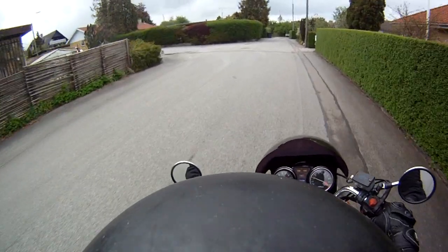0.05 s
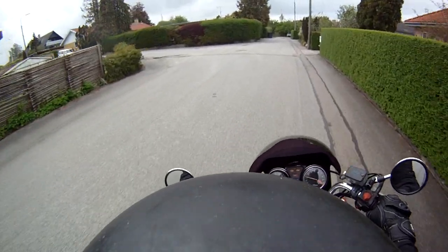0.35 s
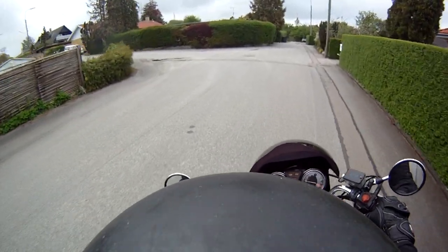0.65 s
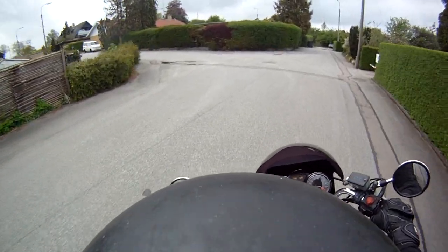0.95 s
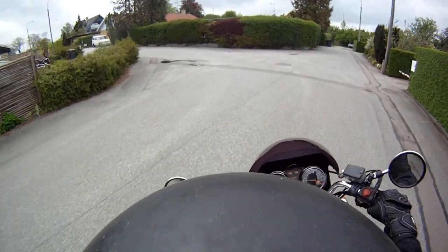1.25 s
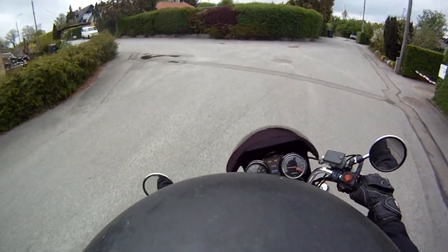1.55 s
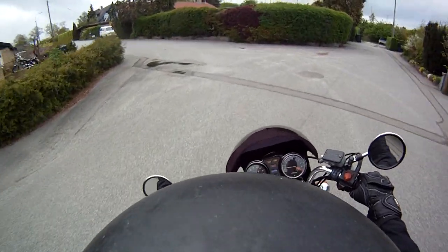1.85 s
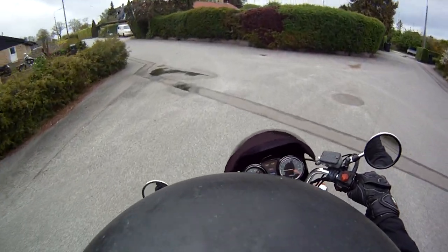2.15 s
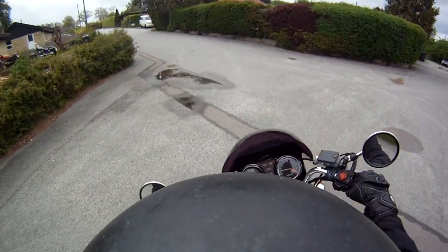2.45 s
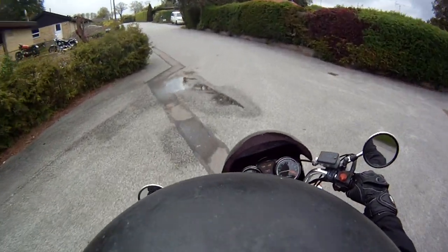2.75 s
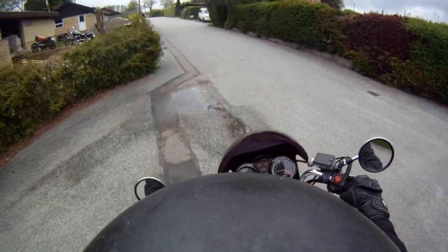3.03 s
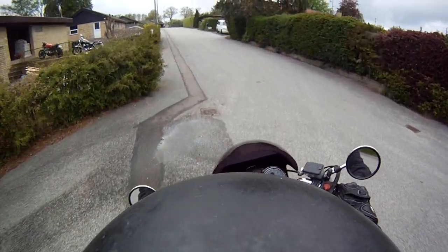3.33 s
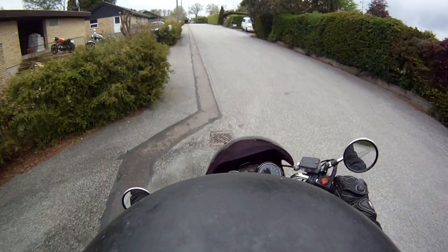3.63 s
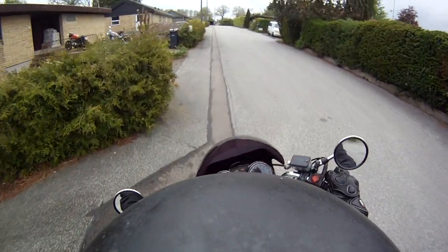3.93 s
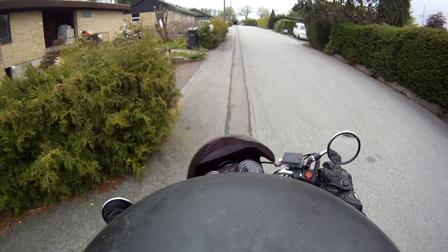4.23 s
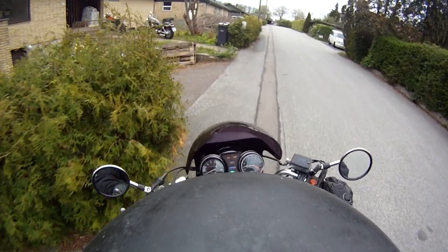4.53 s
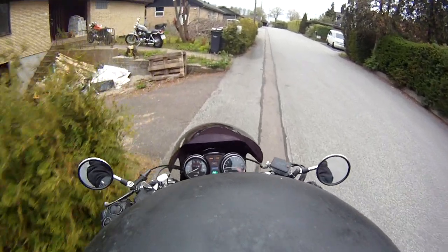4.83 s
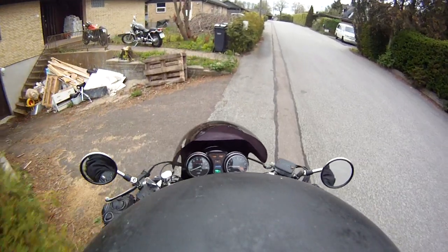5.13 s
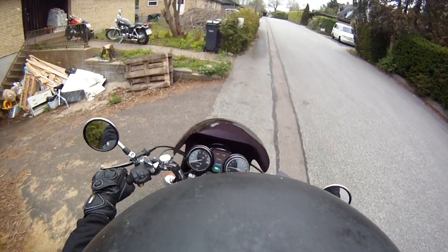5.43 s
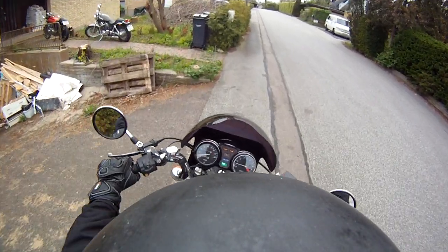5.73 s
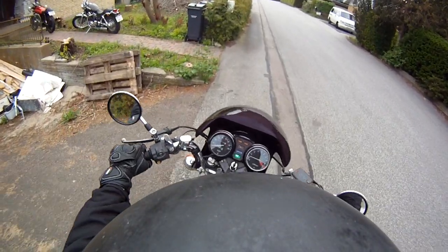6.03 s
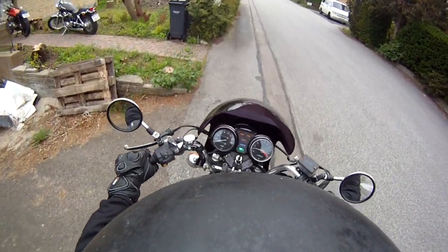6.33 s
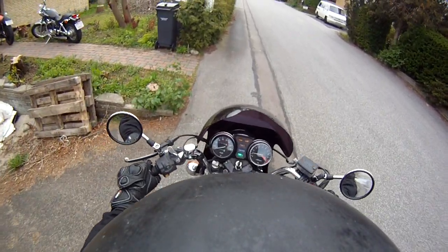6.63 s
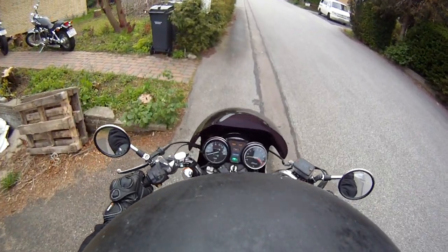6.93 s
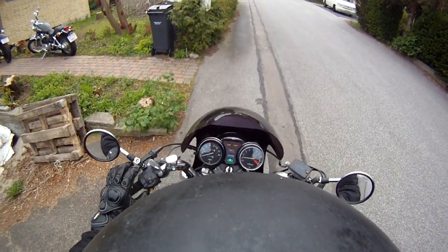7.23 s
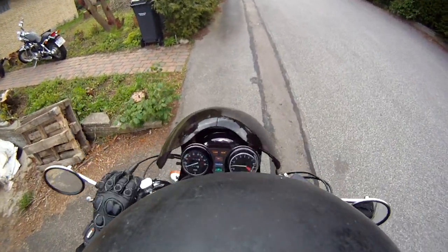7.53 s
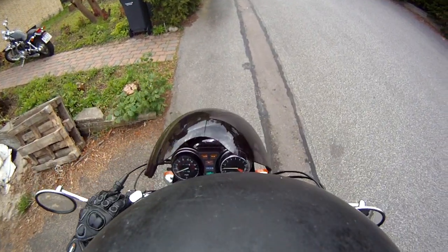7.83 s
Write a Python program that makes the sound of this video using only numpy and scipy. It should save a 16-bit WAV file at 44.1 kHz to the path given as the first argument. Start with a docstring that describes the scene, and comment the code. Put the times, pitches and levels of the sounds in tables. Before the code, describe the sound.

A four-cylinder motorcycle slows along a residential street, heard close up from the rider's helmet. In the first second the revs fall, stumbling once, and settle into a low, lumpy idle that lasts throughout, with a booming exhaust and lightly rattling gears. Tyre noise and low gusts of wind run underneath. At about 1.3 seconds a gear engages with a metallic clunk, and a faint thin hiss dies away. From 1.5 to 3 seconds road bumps make a string of dull thuds, the strongest near 2.8 seconds. Around 4.8 seconds the brake gives two faint, brief, high squeaks. The tyres then grow quieter and the wind eases as the bike slows to a crawl. Between 7.3 and 7.7 seconds the gear lever clicks softly three times over the idling engine. A slight treble fizz lies over the whole sound.

```python
"""A four-cylinder motorcycle slows down, heard from the rider's helmet. First the revs fall to a lumpy
idle: uneven firings boom in the exhaust and loose gears rattle, over tyre noise and wind. At 1.3 s a
gear clunks in, a thin hiss dies away, and bumps thud until 3 s. Near 4.8 s the brake squeaks twice.
The tyres grow quieter as the bike slows to a crawl, and after 7 s the gear lever clicks.
Throughout, each sample is held at a low rate, which mirrors the sound into a thin treble fizz."""
import sys
import numpy as np
from scipy import signal
from scipy.fft import rfft, irfft, next_fast_len
from scipy.io import wavfile
from scipy.ndimage import uniform_filter1d, map_coordinates

SR = 44100
rng = np.random.default_rng(int(sys.argv[2]) if len(sys.argv) > 2 else 0)


def unload_wav(signal):
    """Save mono or channel-first audio to the path in sys.argv[1] as 16-bit WAV at rate SR, clipped to [-1, 1]."""
    wavfile.write(
        sys.argv[1],
        SR,
        np.round(np.clip(np.atleast_2d(signal).T, -1, 1) * 32767).astype(np.int16),
    )


N = 351477
TIME = np.arange(N) / SR
IDLE_RPM = 1150
# how fast the engine turns (time [s], speed [rpm])
ENGINE_RPM = [(0.0, 1873.3), (0.3, 1626.4), (0.6, 1249.2), (0.85, 1169.0), (1.27, 1180.4), (1.71, 1204.4),
              (2.37, 1158.0), (2.69, 1200.5), (2.9, 1170.8), (4.22, 1162.8), (5.25, 1201.7), (5.53, 1135.7),
              (6.05, 1180.2), (6.22, 1142.8), (6.99, 1112.4), (7.97, 1152.9)]


def exhaust(puff_s=0.012, heat=0.048):
    """Four unequal firings make the pipe boom at its own notes, and each lets out a puff of gas."""
    # one row a cylinder (place in the engine cycle [0-1], boom [dB], puff [dB])
    cylinders = [(0.98, -0.5, -6), (.24, 2.1, 1), (.485, 1.5, 2), (.69, -3, -9)]
    # notes of the pipe at idle (pitch [Hz], width [Hz], level [dB])
    pipe_notes = [(40.1, 16.7, -11), (89.84, 13.26, 0), (115.56, 14.06, -4), (166, 18.3, -24),
                  (248, 31, -31), (338.6, 43, -28)]
    # tone of a gas puff (frequency [Hz], level [dB])
    puff_tone = [(80, -25), (140, -1), (170, 3), (200, -13.5), (320, -2), (410, -12), (560, -3.5),
                 (700, -27), (1000, -29), (2000, -78)]
    firings = strokes([(place, db) for place, db, _ in cylinders], scatter_db=1.0, jitter_s=0.00021)
    gas = strokes([(place, db) for place, _, db in cylinders], scatter_db=1.4, jitter_s=0.0008)
    revs = curve(ENGINE_RPM) / IDLE_RPM
    tuning = revs ** heat  # hotter gas at higher revs tunes the pipe up
    boom = np.zeros(N)
    for k, (hz, width, db) in enumerate(pipe_notes):  # neighbouring notes push the air opposite ways
        boom += (-1) ** k * amp(db) * resonate(firings, hz * tuning, width)
    boom /= np.sqrt(uniform_filter1d(boom ** 2, size=18400) + 1e-20)  # even out over four idle cycles
    boom_db = -18.5 + 3.8 * np.log2(revs) + .9 * speed_doublings()
    stumble_db = swells([(.54, 0.031, -11.5)])  # the engine stumbles once as the revs fall
    puffs = unit(colour(fade(gas, puff_s) * rng.standard_normal(N), puff_tone))
    return amp(boom_db + stumble_db) * boom + amp(roughness_db() - 42) * puffs


def gear_train(rattle_s=0.017, tick_s=0.0018, knock_s=0.0082):
    """Loose parts strike in every engine cycle: gears rattle, valves tick, clutch and pistons knock."""
    # gear teeth hitting as their slack closes (place in the cycle [0-1], strength [dB])
    tooth_hits = [(.1, -8.5), (.135, 3), (.19, 0), (.28, -3), (.36, -2.5), (.44, -2.5), (.54, -5),
                  (.64, -9), (.75, -3), (.87, -10), (.98, -7)]
    # tone of the engine case (frequency [Hz], level [dB])
    case_tone = [(300, -15), (600, -4), (800, -5), (1100, 5.5), (1350, -0.5), (1600, 5), (2200, 2),
                 (2600, 4), (3200, -7), (4100, -13.5), (5000, -13.5), (5800, -33)]
    # valve ticks (place in the cycle [0-1], strength [dB])
    valve_hits = [(.088, 0), (.34, -10), (.64, -14), (.97, -9)]
    # notes they ring in the cylinder head (pitch [Hz], level [dB], time to fade 60 dB [s])
    head_notes = [(1565, -11, .05), (1930, 0, .06), (2600, -13, .03), (3733, -15, .05), (4627, -22, .05)]
    # dull knocks of clutch and pistons (place in the cycle [0-1], strength [dB])
    dull_hits = [(.11, -1.5), (.25, -1), (.39, -2.5), (.54, -5)]
    # notes they ring in the engine block (pitch [Hz], level [dB], time to fade 60 dB [s])
    block_notes = [(280.4, 2, 0.083), (342, -1.5, 0.054), (474, 2, 0.065), (526, -4, 0.07),
                   (580, -2.5, 0.17)]
    teeth = strokes(tooth_hits, scatter_db=1.2, jitter_s=0.0017)
    bursts = fade(teeth, rattle_s) * rng.standard_normal(N)
    rattle = unit(colour(bursts * amp(1.9 * drift(450)), case_tone))
    ticks = strokes(valve_hits, scatter_db=1.5, jitter_s=0.00046)
    chatter = .03 * fade(ticks, tick_s) * rng.standard_normal(N)  # the valve bounces on its seat
    head = unit(signal.oaconvolve(ticks + chatter, ring(head_notes))[:N])
    knocks = strokes(dull_hits, scatter_db=0.0, jitter_s=0.00089)
    blows = fade(knocks, knock_s) * rng.standard_normal(N)
    block = unit(signal.oaconvolve(blows, ring(block_notes))[:N])
    return amp(roughness_db()) * (amp(-46) * rattle + amp(-51.8) * head + amp(-40.5) * block)


def tyres_and_wind(db_per_doubling=5.5):
    """Tyre roar and a hiss of chain and air follow speed and road surface; wind gusts on the helmet."""
    # tones of the roar, the hiss and the wind, each (frequency [Hz], level [dB])
    roar_tone = [(70, -22), (140, 2), (180, -1.5), (240, -3.5), (340, -6.5), (490, -9), (680, -19.5),
                 (1000, -27), (2000, -66)]
    hiss_tone = [(400, -36), (700, -3.5), (950, -4), (1200, -0.5), (1500, -6), (2000, -5), (2600, -3),
                 (3200, -7), (4000, -14.5), (5000, -22.5), (5800, -11.5)]
    wind_tone = [(10, -18), (22, -5), (45, 6), (90, 2.5), (150, -5), (250, -22), (600, -50)]
    # coarse (+) and smooth (-) asphalt (middle [s], half-length [s], extra roar [dB], extra hiss [dB])
    patches = [(.9, .25, -4, -0.5), (1.434, 0.065, 7, 7), (1.92, 0.25, 3.5, 1.5), (2.2, 0.094, -1.5, -3.5),
               (2.52, 0.17, 7, 3), (3.498, 0.95, 3, 1), (4.72, 0.14, 4.5, 0.5), (5.2, .2, 3.5, -1),
               (6.2, .45, 3.5, -1.3)]
    # gusts of side wind (middle [s], half-length [s], extra level [dB])
    gusts = [(.25, 0.25, 7), (1.87, 0.36, 9.5), (2.7, 0.39, 9.5), (4.3, 1.65, 5.5)]
    flutter = drift(35)  # shakes all three sounds together
    roar = unit(colour(rng.standard_normal(N), roar_tone) * amp(0.82 * flutter + 1.16 * drift(170)))
    hiss = unit(colour(rng.standard_normal(N), hiss_tone) * amp(0.82 * flutter + 0.72 * drift(400)))
    wind = unit(colour(rng.standard_normal(N), wind_tone) * amp(1.2 * flutter))
    speed_db = db_per_doubling * speed_doublings()
    roar_db = -32 + speed_db + swells((s, half_s, db) for s, half_s, db, _ in patches)
    hiss_db = -40 + speed_db + swells((s, half_s, db) for s, half_s, _, db in patches)
    wind_db = -32 + swells(gusts)
    return amp(roar_db) * roar + amp(hiss_db) * hiss + amp(wind_db) * wind


def gear_change(ring_db=4):
    """Gears lock together with a clash that rings in the casing and thumps through the drive."""
    # gear clunks, then lever clicks (time [s], clash [dB], fade time [s], thump [dB])
    clunks = [(1.313, -21.5, 0.026, -32), (1.322, -22.5, 0.011, -14), (1.334, -28, 0.016, -12),
              (7.337, -38, 0.007, -42), (7.561, -34, 0.0075, -44), (7.654, -38, 0.013, -44)]
    # tone of the clash (frequency [Hz], level [dB])
    clash_tone = [(300, -4), (600, -4), (850, -9), (1100, 0.5), (1400, -10), (1650, -8), (2300, -13),
                  (2750, -3), (3100, -23), (3750, -7.5), (4400, -27), (5800, -7.5)]
    # bright casing notes and low drive notes, each (pitch [Hz], level [dB], time to fade 60 dB [s])
    casing_notes = [(1624, 1.5, 0.063), (2230, 8.5, 0.03), (2500, 3, 0.059), (2720, -22, 0.056),
                    (4040, -17, 0.11)]
    drive_notes = [(332, -21, 0.096), (381.7, 12.5, 0.17), (490, 2.5, 0.12), (574, 2.5, 0.081)]
    out, t = np.zeros(N), TIME[:SR // 4]
    casing, thump = ring(casing_notes), ring(drive_notes)
    for s, db, decay_s, thump_db in clunks:
        clash = unit(colour(rng.standard_normal(len(t)), clash_tone)) * np.exp(-t / decay_s)
        add(out, s, amp(db) * (clash + amp(ring_db) * casing / abs(casing).max()))
        add(out, s, amp(thump_db) * thump / abs(thump).max())
    return out


def road_bumps(rise_s=0.00488, band_hz=(110, 380)):
    """Bumps in the road give short dull thuds."""
    # jolts from the road (time [s], peak level [dB])
    bumps = [(1.49, -18.5), (1.591, -23), (1.615, -30), (1.82, -14.5), (2.183, -18), (2.441, -18.5),
             (2.543, -16.5), (2.78, -9), (2.876, -20.5), (2.959, -14.5)]
    out, t = np.zeros(N), TIME[:SR // 10]
    dull = signal.butter(4, band_hz, "band", fs=SR, output="sos")
    for s, db in bumps:
        thud = signal.sosfilt(dull, rng.standard_normal(len(t)) * t * np.exp(-t / rise_s))
        add(out, s - rise_s, amp(db) * thud / abs(thud).max())
    return out


def brake(pitch_hz=2612, waver_hz=22):
    """A brake pad sings faintly on the disc, its pitch unsteady."""
    # squeaks of the pad (time [s], level [dB], rise time [s], fade time [s])
    squeaks = [(4.72, -48, .012, .08), (4.853, -41.5, .018, .05)]
    turns = np.cumsum(pitch_hz + waver_hz * drift(90)) / SR
    level = sum(amp(db) * np.exp(-np.maximum((s - TIME) / rise_s, (TIME - s) / decay_s))
                for s, db, rise_s, decay_s in squeaks)
    return level * unit(np.sin(2 * np.pi * turns))


def thin_hiss(fade_from_s=1.44, fade_db_per_s=27):
    """A thin, slightly grainy hiss stays steady, then dies away once the gear is in."""
    # tone of the hiss (frequency [Hz], level [dB])
    hiss_tone = [(2500, -14), (3800, -3.5), (5000, 2), (5800, -4.5)]
    level_db = -48 - fade_db_per_s * np.maximum(TIME - fade_from_s, 0)
    grains = rng.standard_normal(N) * amp(1.2 * drift(300))
    return amp(level_db) * unit(colour(grains, hiss_tone))


def roughness_db(calming_rpm=120):
    """Clatter and puffs grow louder as the revs sink, and swell briefly around 7.25 s as the rider looks down
    at the engine."""
    idling = np.exp((IDLE_RPM - curve(ENGINE_RPM)) / calming_rpm)
    return -2 + 1.62 * idling + swells([(7.25, 0.27, 2)])


def speed_doublings(cruise_kmh=20):
    """Road speed compared with cruising: +1 is twice as fast, -1 is half as fast."""
    # how fast the bike rolls (time [s], speed [km/h])
    road_speed = [(0, 28.6), (1.1, 19.2), (4.1, 22.6), (5.5, 10.8), (7.2, 7.1), (7.97, 9.4)]
    return np.log2(curve(road_speed) / cruise_kmh)


def strokes(pattern, scatter_db, jitter_s, start_place=.564):
    """Clicks at set places in every engine cycle, each a little off in time and strength."""
    cycles = start_place + np.cumsum(curve(ENGINE_RPM)) / (2 * 60 * SR)  # a cycle is two engine turns
    out = np.zeros(N)
    for place, db in pattern:
        late, strong = rng.standard_normal((100, 2)).T
        times = np.interp(np.arange(len(late)) + place % 1, cycles, TIME, left=-1, right=-1)
        times += jitter_s * late
        heard = (times > 0) & (times < TIME[-1])
        out[(times[heard] * SR).astype(int)] += amp(db + scatter_db * strong[heard])
    return out


def resonate(x, hz, width):
    """Rings at a moving pitch: shift that pitch down to zero, smooth, and shift back."""
    turn = np.exp(2j * np.pi * np.cumsum(hz) / SR)
    decay = np.exp(-np.pi * width / SR)
    return 2 * (turn * signal.lfilter([1 - decay], [1, -decay], x / turn)).real


def ring(notes):
    """The ring of struck metal: a sum of dying pure tones."""
    t = TIME[:SR // 4]
    return sum(amp(db - 60 * t / max(ring_s, .005)) * np.sin(2 * np.pi * hz * t)
               for hz, db, ring_s in notes)


def colour(x, points):
    """Shapes the tone with a curve drawn through (frequency [Hz], level [dB]) points."""
    hz, db = np.transpose(points)
    size = next_fast_len(len(x) + 4096)
    freqs = np.fft.rfftfreq(size, 1 / SR)
    gain = amp(np.interp(np.log(freqs + 1), np.log(hz + 1), db))
    return irfft(rfft(x, size) * gain, size)[:len(x)]


def fade(x, decay_s):
    """Gives each click a dying tail."""
    return signal.lfilter([1], [1, -np.exp(-1 / (SR * decay_s))], x)


def drift(per_s):
    """A smooth random wobble that changes about per_s times a second."""
    knots = rng.standard_normal(4096)
    return unit(map_coordinates(knots, [TIME * per_s], order=3, mode="wrap"))


def swells(rows):
    """Smooth rises and dips, one for each row of (middle [s], half-length [s], change [dB])."""
    return sum(db * np.exp(-((TIME - s) / half_s) ** 2) for s, half_s, db in rows)


def curve(rows):
    """A timed table's value at every sample."""
    return np.interp(TIME, *np.transpose(rows))


def add(mix, s, sound):
    """Lays a sound into the mix at time s."""
    part = mix[round(s * SR):][:len(sound)]
    part += sound[:len(part)]


def amp(db):
    """Turns decibels into a gain."""
    return 10 ** (np.asarray(db) / 20)


def unit(x):
    """Scales a signal to an average (rms) level of 1."""
    return x / np.sqrt(np.mean(x ** 2) + 1e-20)


def scene():
    """Engine, road, gearbox and brake, mixed into one channel at the helmet."""
    mix = exhaust() + gear_train() + tyres_and_wind() + thin_hiss() + road_bumps() + gear_change()
    return (mix + brake())[None]


def record(dry, band_hz=5500, hold_hz=12000, top_hz=15330, ease_s=.004):
    """Cuts the treble, then holds each sample, which mirrors the sound around the hold rate as fizz."""
    eased = dry * np.minimum(np.minimum(TIME, TIME[::-1]) / ease_s, 1)
    narrow = signal.oaconvolve(eased, signal.firwin(121, band_hz, fs=SR)[None], "same")
    mirrored = narrow * (1 + 2 * np.cos(2 * np.pi * hold_hz * TIME))
    droop = np.sinc(np.fft.rfftfreq(N, 1 / SR) / hold_hz)  # holding also softens the highs
    held = irfft(rfft(mirrored) * droop, N)
    top_cut = signal.firwin(801, top_hz, window=("kaiser", 9), fs=SR)
    return signal.oaconvolve(held, top_cut[None], "same")


dry = scene()
out = record(dry)
unload_wav(out)
```